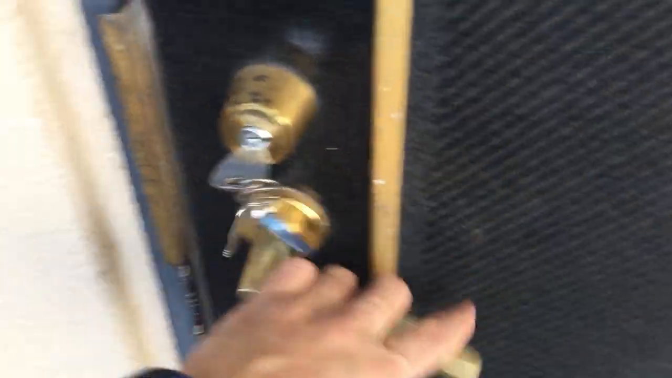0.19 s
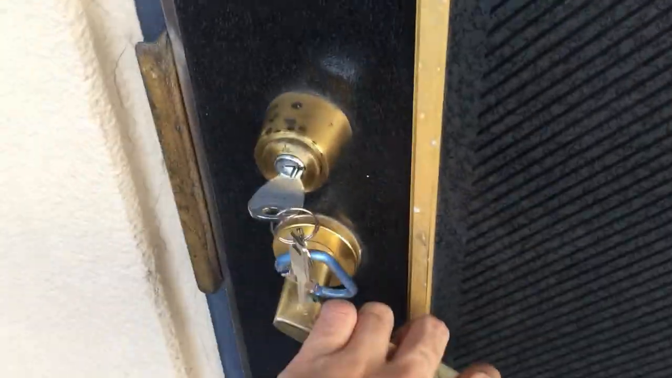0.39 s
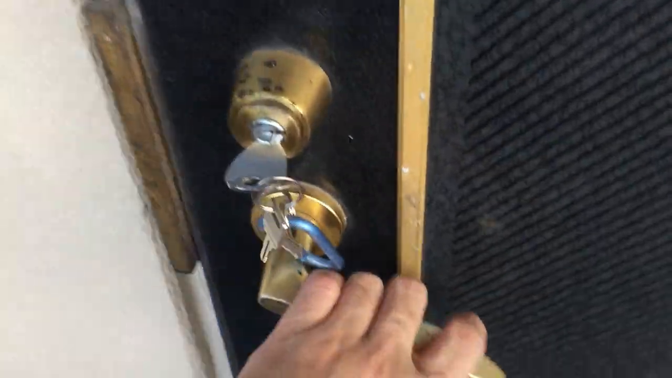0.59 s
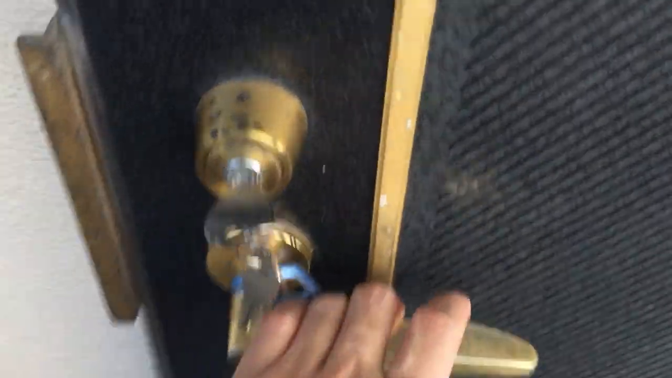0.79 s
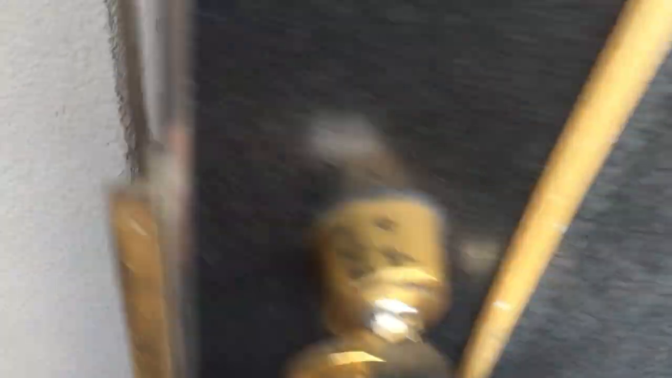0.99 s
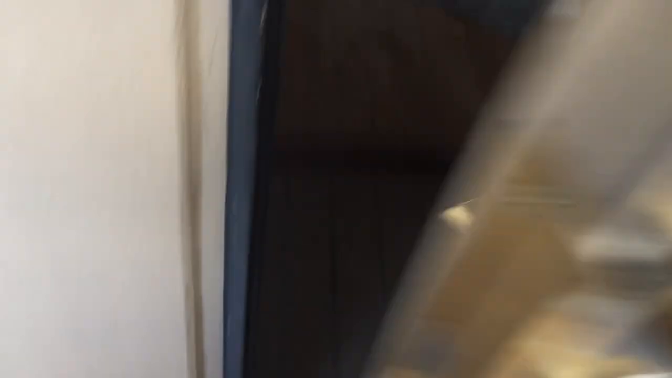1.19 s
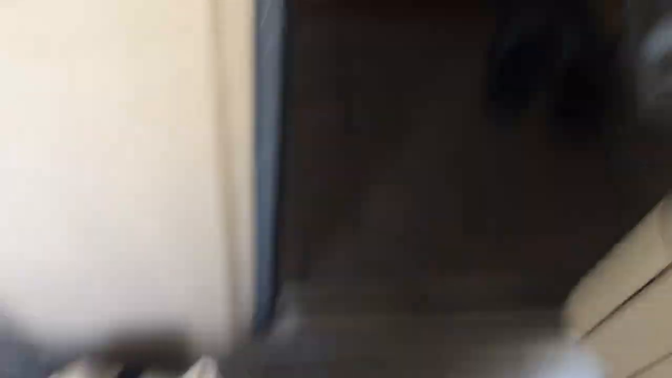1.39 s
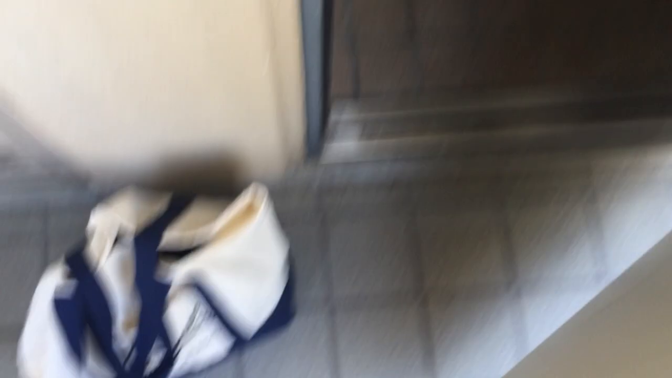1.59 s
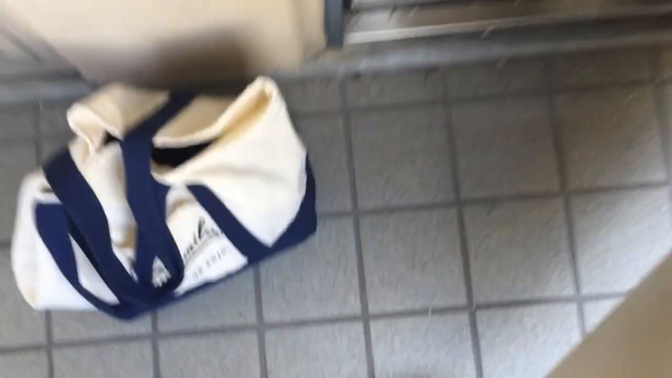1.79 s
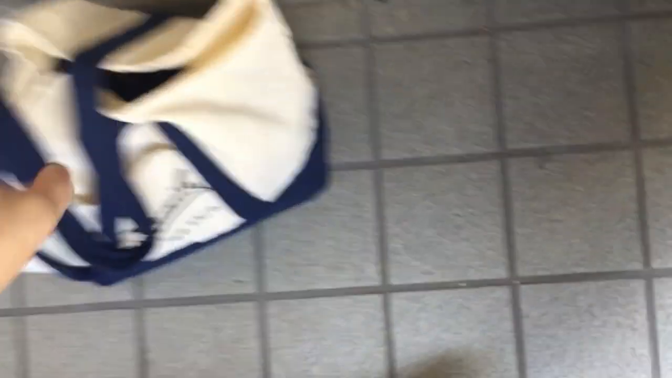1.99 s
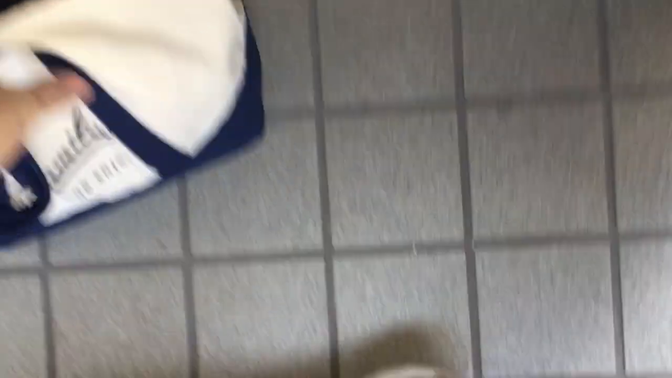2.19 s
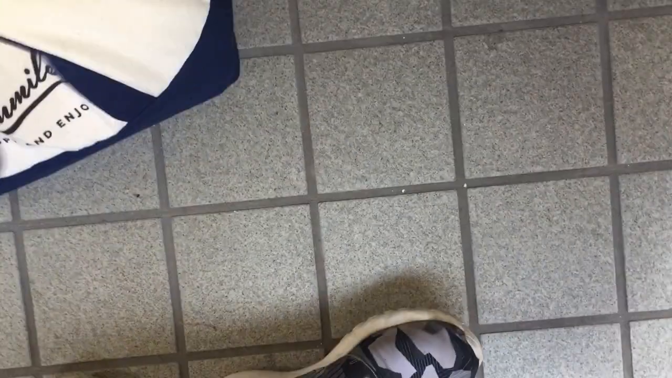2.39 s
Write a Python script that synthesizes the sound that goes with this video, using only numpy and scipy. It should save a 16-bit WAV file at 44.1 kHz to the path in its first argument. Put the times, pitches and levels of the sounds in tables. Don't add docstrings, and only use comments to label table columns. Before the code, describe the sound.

Close, slightly thin handheld sound of a steel door being opened in a hard tiled passage: small key chimes, rapid metallic handle knocks, a resonant release, another bright clink, then quiet bag and shoe rustling.

```python
import sys
import numpy as np
from scipy import signal
from scipy.fft import rfft, irfft
from scipy.io import wavfile
from scipy.ndimage import uniform_filter1d

SR = 44100
rng = np.random.default_rng(int(sys.argv[2]) if len(sys.argv) > 2 else 0)


def to_wav(s):
    ch = np.atleast_2d(s).T
    pcm = np.round(np.clip(ch, -1, 1) * 32767)
    wavfile.write(sys.argv[1], SR, pcm.astype(np.int16))


def volts_from_db(level):
    exponent = np.asarray(level, float) / 20
    return 10 ** exponent


N = 110250


def evened(x):
    return x / np.sqrt(np.mean(x ** 2) + 1e-20)


def read(points, hz):
    f, value = np.transpose(points)
    return np.interp(np.log(hz + 1), np.log(f + 1), value)


def add(mix, s, sound):
    part = mix[round(s * SR):][:len(sound)]
    part += sound[:len(part)]


def dying(t60):
    t = np.arange(int(t60 * SR) + 8) / SR
    return t, volts_from_db(-60 * t / t60)


def band(x, hz, wide):
    edges = [hz / (1 + wide), min(hz * (1 + wide), SR / 2 - 99)]
    return signal.sosfilt(signal.butter(N=2, Wn=edges, btype="band", fs=SR, output="sos"), x)


def colour(x, points):
    gain = volts_from_db(read(points, np.fft.rfftfreq(len(x), 1 / SR)))
    return irfft(rfft(x) * gain, len(x))


def ring(modes, hits, spread_db):
    out = np.zeros(N)
    luck = rng.standard_normal((len(hits), len(modes)))
    for (s, hit_db), row in zip(hits, luck):
        for (hz, mode_db, t60), z in zip(modes, row):
            t, fade = dying(t60)
            level = volts_from_db(hit_db + mode_db + spread_db * z)
            add(out, s, level * fade * np.sin(2 * np.pi * hz * t))
    return out


def single_modes(rows, rise_s):
    out = np.zeros(N)
    for s, db, hz, t60 in rows:
        t, fade = dying(t60)
        swell = 1 - np.exp(-t / rise_s)
        add(out, s, volts_from_db(db) * swell * fade * np.sin(2 * np.pi * hz * t))
    return out


def ticks(rows, wide):
    snap_height = 2.2
    out = np.zeros(N)
    grit = rng.standard_normal((len(rows), 6000))
    for (s, db, hz, t60), g in zip(rows, grit):
        t, fade = dying(t60)
        snap = snap_height * (np.arange(len(t))[:6000] == 2)
        drive = g[:len(t)] * fade[:6000] + snap
        add(out, s, volts_from_db(db) * band(drive, hz, wide))
    return out


def release():
    # (frequency [Hz], level [dB], t60 [s])
    door_modes = [(302, -2.5, 0.22), (288, -15, 0.25), (200, -15.5, 0.097), (342, -13.5, 0.26),
                  (1065, -20.5, 0.17), (1806, -13, 0.11), (1852, -5.5, 0.071), (2130, -5, 0.064),
                  (2473, -20, 0.11), (770, 0.5, 0.01)]
    return ring(door_modes, [(.6085, -22.5)], 0)


def thumps():
    # (time [s], level [dB], frequency [Hz], t60 [s])
    thump_rows = [(.588, -26, 1280, .016), (0.184, -33, 127, 0.11), (0.26, -29, 270, 0.039),
                  (1.407, -62, 7800, .065), (1.407, -58, 5140, 0.051), (1.2, -38.5, 2620, 0.019),
                  (.253, -34, 2060, 0.066), (.261, -30.5, 2127, 0.04), (0.327, -27, 207, 0.15),
                  (0.199, -37.5, 200, 0.095), (.33, -29, 135, 0.1), (.335, -33.5, 369, 0.1),
                  (0.386, -34.5, 338, 0.036), (0.48, -30.5, 364, 0.061), (0.526, -33.5, 345, 0.077),
                  (0.565, -45, 334, 0.061), (0.607, -38, 146, 0.14), (0.758, -48.5, 278, 0.21),
                  (0.811, -48, 94, 0.096), (0.972, -43.5, 211, 0.15), (1.126, -41.5, 218.4, 0.14),
                  (1.554, -39, 59.5, 0.087)]
    return single_modes(thump_rows, rise_s=0.0017)


def knocks():
    # (time [s], level [dB], frequency [Hz], t60 [s])
    knock_rows = [(.164, -50, 775, 0.096), (.642, -36, 1760, 0.037), (.455, -60, 3470, 0.038),
                  (.489, -53, 3060, .03), (.508, -48, 1400, 0.028), (.533, -44, 1370, .025),
                  (.563, -50.5, 2930, 0.03), (.275, -52, 1920, 0.044), (.254, -41, 1420, .09),
                  (.615, -43, 2096, .25), (1.121, -50.5, 2660, .05), (1.365, -57.5, 1010, 0.04),
                  (.255, -45.5, 760, 0.11), (.322, -43.5, 3200, 0.035), (.321, -34, 1815, 0.049),
                  (.383, -37.5, 1350, 0.029), (.443, -41, 1160, 0.022), (.479, -33.5, 1300, 0.025),
                  (.524, -35, 1100, 0.032), (.561, -36.5, 1350, 0.049), (.96, -58, 1050, .33),
                  (.608, -29, 1607, 0.038), (.76, -49.5, 2440, 0.075), (1.122, -50, 975, 0.12),
                  (1.435, -54.5, 957, .06), (1.63, -54, 767, 0.072), (1.653, -71, 874, 0.018),
                  (1.9, -56.5, 844, 0.053), (2.011, -55.5, 820, .04), (2.026, -53, 604, .05)]
    wide, rise_s, tone_db, grit_db = 0.33, 0.00028, 0, 1
    out = np.zeros(N)
    noise = rng.standard_normal((len(knock_rows), 16000))
    for (s, db, hz, t60), g in zip(knock_rows, noise):
        t, fade = dying(t60)
        tone = volts_from_db(tone_db) * np.sin(2 * np.pi * hz * t)
        grit = volts_from_db(grit_db) * evened(band(g, hz, wide))[-len(t):]
        drive = (tone + grit) * fade * (1 - np.exp(-t / rise_s))
        add(out, s, volts_from_db(db) * band(drive, hz, 2 * wide))
    return out


def lock_ticks():
    # (time [s], level [dB], centre [Hz], t60 [s])
    tick_rows = [(.0887, -40, 14300, 0.017), (.2068, -31.5, 5840, 0.021), (.248, -36.5, 7600, 0.019),
                 (.317, -36, 4770, 0.01), (.3212, -28, 7600, 0.03), (.3835, -47.5, 7860, 0.011),
                 (.608, -36, 5400, 0.046), (.6082, -37.5, 14000, 0.014), (1.1204, -41.5, 6400, 0.014),
                 (1.1997, -30.5, 10800, 0.015), (2.371, -55, 4970, 0.007), (2.497, -55.5, 8100, 0.0094)]
    return ticks(tick_rows, 0.95)


def scrape():
    # (time [s], level [dB])
    effort = [(0, -76), (.15, -64.5), (.3, -48.5), (.4, -48), (.56, -41), (.69, -46), (.73, -51.5),
              (.8, -45.5), (.85, -53), (.95, -68.5), (1.1, -60.5), (1.35, -66)]
    # (frequency [Hz], level [dB per Hz])
    scrape_spectrum = [(65, -41), (110, -9), (299, -3), (444, -12), (2160, -20), (4220, -41), (6400, -37.5),
                       (16000, -58)]
    slips_per_s, slip_spread_db = 4000, 1.6
    height = volts_from_db(slip_spread_db * np.minimum(rng.exponential(1, N), 4))
    slips = height * (rng.random(N) < slips_per_s / SR) * rng.standard_normal(N)
    friction = evened(slips) + 0.77 * rng.standard_normal(N)
    s, db = np.transpose(effort)
    s, db = np.r_[s, s[-1] + .3], np.r_[db, db[-1] - 25]
    level = volts_from_db(np.interp(np.arange(N) / SR, s, db))
    return level * evened(colour(friction, scrape_spectrum))


def grip():
    level_db, centre_hz, until_s, fade_s = -55.5, 117, 1.17, 0.3
    lumps = volts_from_db(2.7 * evened(uniform_filter1d(rng.standard_normal(N), size=1800)))
    alive = np.clip((until_s - np.arange(N) / SR) / fade_s, 0, 1)
    return volts_from_db(level_db) * alive * evened(lumps * band(rng.standard_normal(N), centre_hz, 0.57))


def keys():
    # (frequency [Hz], level [dB], t60 [s])
    long_key = [(3740, -19, .09), (9288, -11, .085), (13850, 0, .15)]
    split_ring = [(14160, 0, .11), (11480, -7, .03), (13350, -8, .04), (9285, -5, .06)]
    short_key = [(4105, 0, .06), (4060, -9, .07), (5130, -11, .04), (7780, -16, .05), (11300, -9, .03),
                 (3747, -8, .06)]
    clip = [(8430, 0, .045), (3600, -6, .11), (11230, -12, .05), (5071, -14, .12)]
    tag = [(5720, 0, .043), (7780, -6, .028), (9730, -4, .03), (14100, -4, .05)]
    # (time [s], level [dB])
    long_hits = [
        (0.2148, -36.5),
    ]
    ring_hits = [
        (.047, -59),
        (.058, -60),
        (.101, -59),
        (.151, -57),
        (.23, -54),
        (.342, -51),
        (.384, -60),
        (.437, -64),
        (1.2, -51),
    ]
    short_hits = [
        (1.2, -51),
        (1.2246, -49),
        (1.407, -63),
        (1.438, -69),
        (1.468, -68),
    ]
    clip_hits = [
        (.036, -66),
        (.044, -54),
        (.074, -76),
        (.743, -83),
        (.779, -74),
        (1.073, -60),
        (1.318, -70),
    ]
    tag_hits = [
        (.121, -61),
        (1.289, -54),
        (1.305, -68),
    ]
    # (time [s], level [dB], frequency [Hz], t60 [s])
    pings = [(.1005, -55, 9288, .05), (.152, -53, 9280, .1), (.324, -46, 9000, .04),
             (.047, -52, 11600, .03), (.058, -58, 11400, .025), (.074, -60, 11350, .04),
             (.058, -60, 8500, .06), (.163, -59, 13800, .12), (.0887, -50, 13100, .015),
             (1.072, -57, 3950, .018), (1.104, -63, 2600, .06), (1.122, -54, 9600, .025),
             (1.121, -56, 4250, .02), (1.183, -71, 8430, .05), (1.2, -50, 11560, .016),
             (1.2, -54, 9765, .028), (1.2, -54, 13830, .03), (1.2, -57, 4753, .022),
             (1.289, -66, 3682, .05), (.03, -66, 5150, .35), (1.305, -68, 6500, .025),
             (1.408, -65, 3100, .04), (1.417, -66, 3140, .04), (1.416, -72, 11160, .07),
             (1.439, -68, 11160, .04), (1.44, -71, 9744, .06), (1.467, -70, 5200, .05),
             (.758, -62, 6600, .04), (.779, -62, 6500, .04), (.779, -66, 5750, .2)]
    # (time [s], level [dB], centre [Hz])
    crackles = [(.0635, -46, 12500), (.074, -51, 11000), (.199, -42, 11900), (0.341, -38, 5030),
                (0.252, -38, 4200), (0.7, -44.5, 7000), (.702, -64, 13000), (0.759, -48.5, 12600),
                (.759, -52, 5540), (.769, -60, 12700), (0.78, -58, 12300), (0.789, -56, 12300),
                (0.795, -56, 12700), (1.289, -44, 13000), (1.289, -52, 4300), (.537, -58, 12500),
                (.8185, -53, 6500), (.8185, -60, 11800), (1.428, -55, 5000), (1.448, -57, 5250),
                (2.335, -53, 6300), (2.35, -55, 9000), (1.915, -64, 9400), (1.928, -64, 9300)]
    pieces = [(long_key, long_hits), (split_ring, ring_hits), (short_key, short_hits),
              (clip, clip_hits), (tag, tag_hits)]
    chimes = sum(ring(modes, hits, 0.66) for modes, hits in pieces)
    contacts = [(s, db + 6, 9900, 0.0081) for _, hits in pieces for s, db in hits]
    drags = [(s, db, hz, .014) for s, db, hz in crackles]
    loose = rattle([mode for modes, _ in pieces for mode in modes])
    return chimes + ticks(contacts, 0.46) + single_modes(pings, rise_s=0.0001) + ticks(drags, .2) + loose


def rattle(modes):
    # (start [s], length [s], level [dB])
    spells = [
        (.03, .115, -69),
        (.145, .03, -67),
        (.17, .03, -74),
    ]
    touches_per_s, damping = 900, .3
    t, level = np.arange(N) / SR, np.zeros(N)
    for s, length, db in spells:
        level += volts_from_db(db) * np.clip(1 - ((t - s) / length * 2 - 1) ** 4, 0, 1)
    out = np.zeros(N)
    for hz, db, t60 in modes:
        touches = level * rng.standard_normal(N) * (rng.random(N) < touches_per_s / SR)
        u, fade = dying(damping * t60)
        chime = volts_from_db(.5 * db) * fade * np.sin(2 * np.pi * hz * u)
        out += signal.oaconvolve(touches, chime)[:N]
    return out


def rubs():
    # (start [s], length [s], level [dB], centre [Hz])
    rub_rows = [(0.038, 0.03, -66, 12500), (0.147, 0.032, -58, 5000), (0.255, 0.022, -48, 3560),
                (0.506, 0.049, -61, 2900), (0.609, 0.04, -61, 9000), (0.614, 0.087, -53.5, 1420),
                (0.745, 0.076, -60, 2450), (1.116, 0.12, -60.5, 856), (1.119, .07, -73, 8000),
                (1.89, 0.092, -72, 1790), (2.173, 0.24, -74, 1640), (2.315, 0.15, -72.5, 2450)]
    wide, grain_db = 1.1, 20
    out = np.zeros(N)
    noise = rng.standard_normal((len(rub_rows), 8000, 2))
    for (s, length, db, hz), g in zip(rub_rows, noise):
        u = np.linspace(0, 1, min(int(length * SR), 8000))
        lumps = volts_from_db(grain_db * uniform_filter1d(g[:, 1], size=40))
        grain = evened(band(g[:, 0] * lumps, hz, wide))
        stroke = np.sqrt(abs(np.sin(np.pi * u ** .7)))
        add(out, s, volts_from_db(db) * stroke * grain[:len(u)])
    return out


def passage(x):
    # (frequency [Hz], t60 [s])
    tile_t60 = [(200, .35), (2000, .24), (12000, .11)]
    taps = np.zeros(SR // 2)
    at = np.arange(120, SR // 2 - 20, 20)
    taps[at + rng.integers(0, 20, len(at))] = rng.choice([-1., 1.], len(at))
    hz, t, z = signal.stft(taps, SR, nperseg=256)
    fade = volts_from_db(-60 * t / read(tile_t60, hz)[:, None])
    tail = signal.istft(z * fade, SR, nperseg=256)[1]
    return signal.fftconvolve(x, tail / np.linalg.norm(tail))[:N]


def hum():
    # (frequency [Hz], level [dB per Hz])
    hum_spectrum = [(12, -39), (20, -5), (65, 6.5), (174, -3.5), (393, -9), (994, -4.5), (4930, -27.5),
                    (13200, -30), (16500, -46)]
    # (centre [Hz], width [Hz], height [dB])
    hum_bumps = [(183.7, 50, 7), (10620, 700, -5)]
    level_db, patch_db = -62, 1.2
    frames, hz = N // 256 + 5, np.fft.rfftfreq(1024, 1 / SR)
    a, b, patches = rng.standard_normal((frames, 513, 3)).T
    patches = evened(uniform_filter1d(uniform_filter1d(patches, 8, 0), 10, 1))
    shape_db = read(hum_spectrum, hz)
    for centre, width, db in hum_bumps:
        shape_db = shape_db + db * np.exp(-((hz - centre) / width) ** 2)
    z = (a + 1j * b) * volts_from_db(shape_db[:, None] + patch_db * patches)
    return volts_from_db(level_db) * evened(signal.istft(z, nperseg=1024, noverlap=768)[1][:N])


def scene():
    wet_db = -16.5
    door = release() + thumps() + knocks() + lock_ticks() + scrape()
    near = door + keys() + rubs()
    return (near + volts_from_db(wet_db) * passage(near) + grip() + hum())[None]


def roll_off(x):
    return signal.sosfilt(signal.butter(12, 16970, fs=SR, output="sos"), x)


def record(dry):
    low_hz, stop_hz = 56, 16100
    high_pass = signal.butter(N=2, Wn=low_hz, btype="high", fs=SR, output="sos")
    low_pass = signal.cheby2(N=10, rs=25, Wn=stop_hz, fs=SR, output="sos")
    mix = signal.sosfilt(low_pass, signal.sosfilt(high_pass, dry))
    return roll_off(mix)


dry = scene()
out = record(dry)
to_wav(out)
```